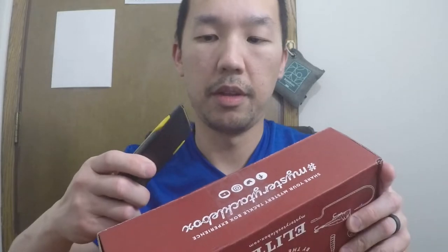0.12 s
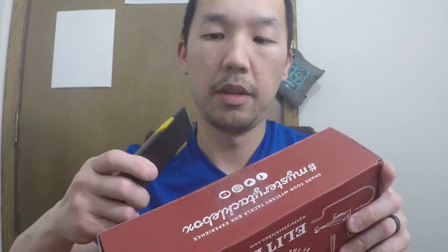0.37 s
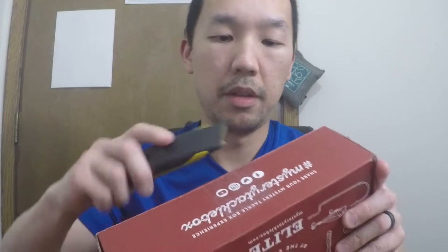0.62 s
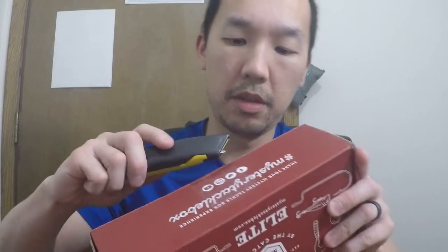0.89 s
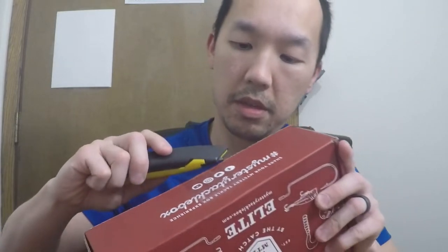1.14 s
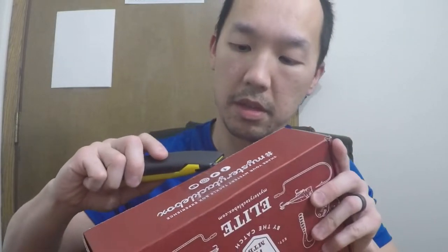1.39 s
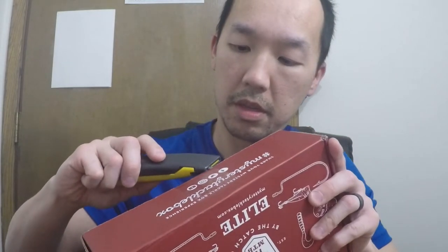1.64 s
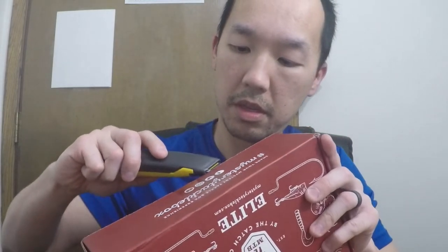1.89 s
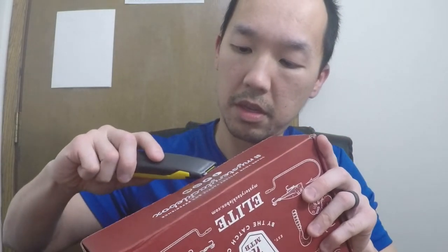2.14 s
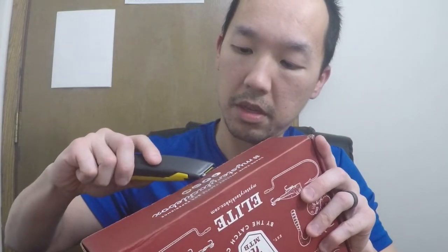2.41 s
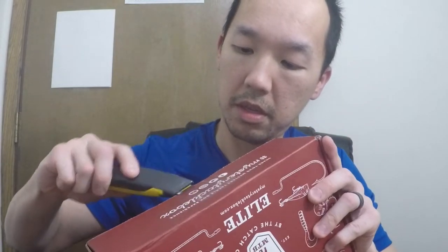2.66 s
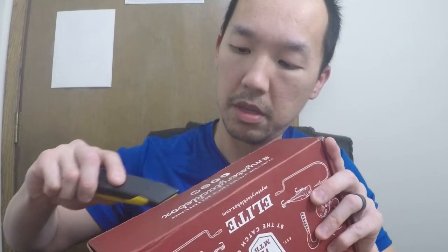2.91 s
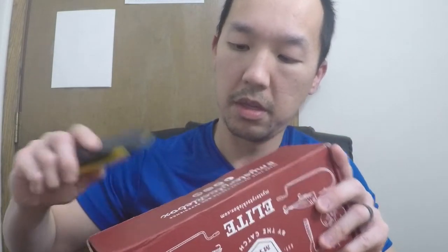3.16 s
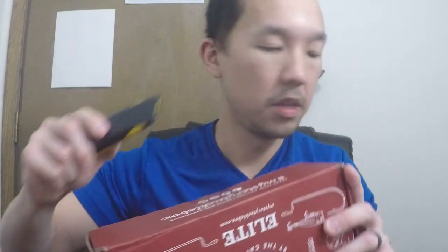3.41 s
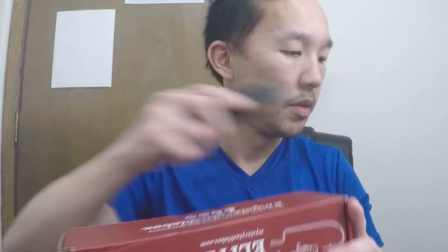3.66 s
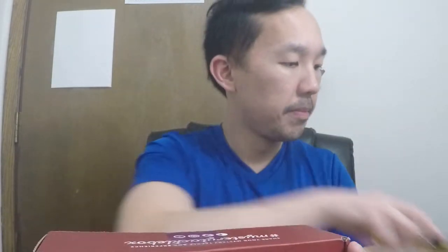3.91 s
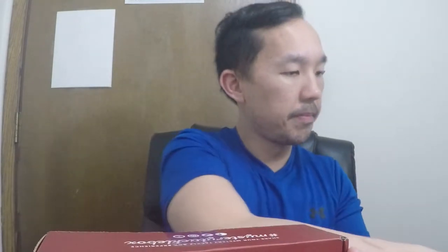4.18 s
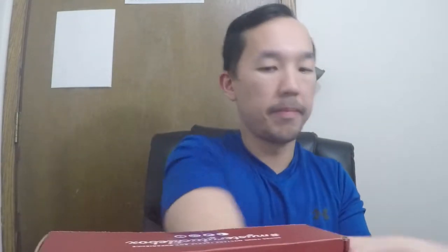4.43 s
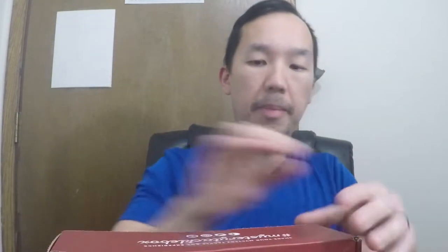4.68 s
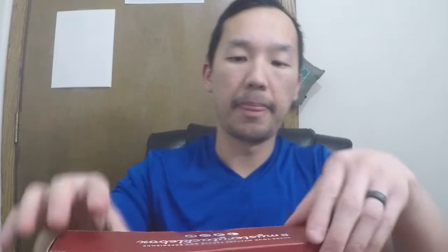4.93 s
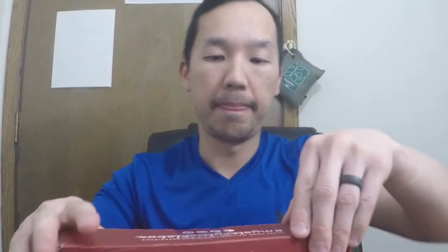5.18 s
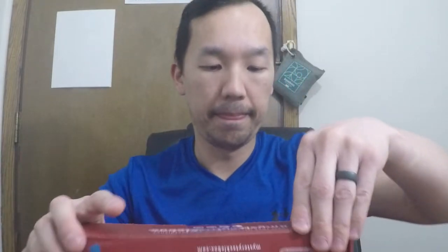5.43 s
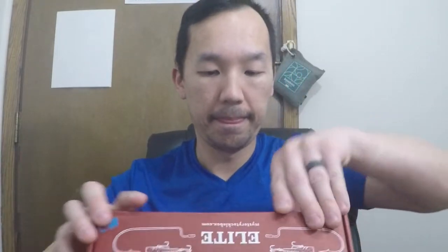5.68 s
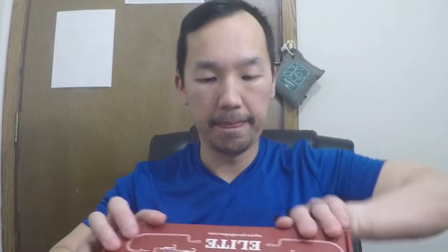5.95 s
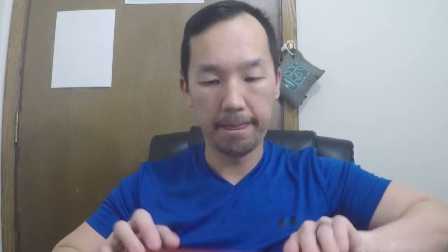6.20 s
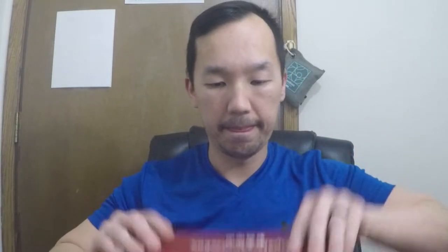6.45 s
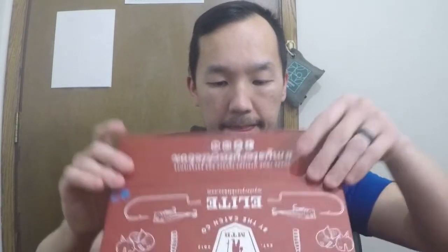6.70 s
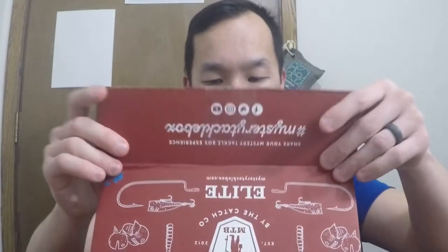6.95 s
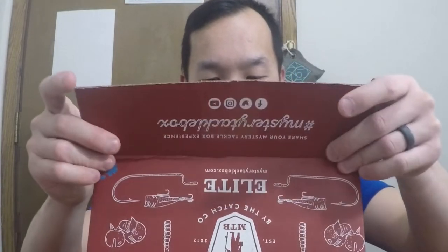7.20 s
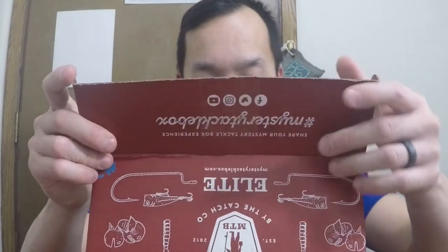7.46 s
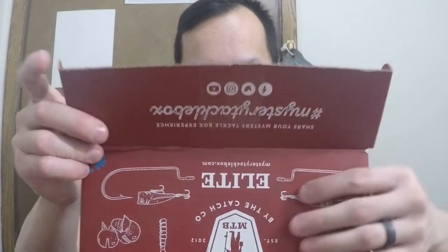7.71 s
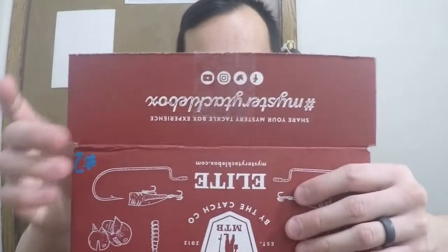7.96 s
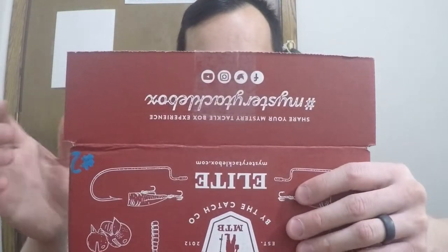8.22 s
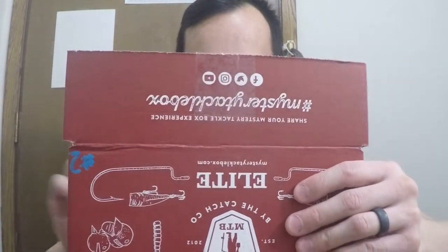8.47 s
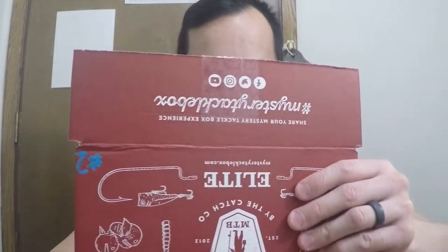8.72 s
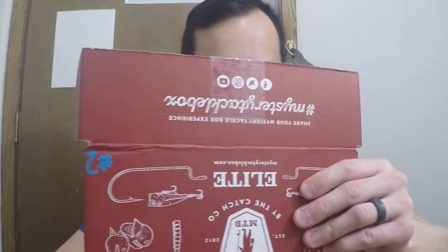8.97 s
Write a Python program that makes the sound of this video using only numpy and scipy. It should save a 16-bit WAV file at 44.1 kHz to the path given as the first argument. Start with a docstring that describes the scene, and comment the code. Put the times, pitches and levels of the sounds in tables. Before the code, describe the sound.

A close, dry small room with faint wavering hiss and a low unsteady hum throughout. From 0 to 0.7 s a plastic knife rattles with bright clicks, over hollow box knocks near 0.1 s and a crisp scratch at 0.4. From 1.3 to 2.4 s come small picking ticks and faint scrapes. At 2.6 s a firm rasp slits the tape, a weaker one follows at 2.9, then clicks at 3.1 and a sharp snap at 3.5. Clicks and a low thud around 3.7-3.9 lead to scraping and a hard clatter at 4.2-4.5, the loudest moment. Quiet rubbing and taps follow near 5.2-5.4. From 5.5 to 6.5 s the lid drags open with coarse, creaking cardboard rasps and hollow thumps around 6.2-6.3. Lighter bumps and scrapes come at 6.7-7.1, soft fumbling at 7.7-8.2, then barely audible brushes to about 9 s.

```python
"""Utility knife and cardboard box

A knife rattles, picks at and slits the taped box close to a small camera's microphone in a quiet room.
The plastic knife clicks bright and the hollow box thuds low: pushes and rattles ring damped modes.
Rubbing, and the lid dragged open card on card, drive panels, creases and surface with random slips.
A noise tail makes the room; faint coloured hiss and an unsteady hum lie under it all."""
import sys
import numpy as np
from scipy import signal
from scipy.fft import rfft, irfft, next_fast_len
from scipy.io import wavfile
from scipy.ndimage import uniform_filter1d, minimum_filter1d

SR = 44100
rng = np.random.default_rng(int(sys.argv[2]) if len(sys.argv) > 2 else 0)


def to_wav(sig):
    """Store sig (one row per channel, or 1-D mono) as 16-bit WAV at the path in sys.argv[1].

    Samples outside -1..1 are clipped; the rate is SR.
    """
    pcm = np.clip(np.atleast_2d(sig), -1, 1) * 32767
    pcm = np.round(pcm).astype(np.int16)
    wavfile.write(sys.argv[1], SR, pcm.T)  # frames by channels


def field_ratio(decibels):
    """Amplitude ratio for a level in dB (20 dB per decade); scalars and array-likes work."""
    return 10 ** (np.asarray(decibels, dtype=float) / 20)


N = 401249
T = np.arange(N) / SR  # seconds
BELOW_DB = 9  # per octave: extra loss of the modes under the driven pitch

# Knife and blade contacts, close to the microphone. Each row: start in seconds, peak in dB before the
# low cut and the room, strongest ring in Hz, treble over the ring in dB before TREBLE_OFFSET_DB.
CONTACTS = [(0.0524, -14, 2400, -36), (0.0988, -9.5, 1820, -27), (.182, -21.5, 2250, -34),
            (0.319, -26.5, 4850, -34), (0.35, -31, 2050, -3), (0.384, -0.5, 4530, -24),
            (.5307, -15, 1780, -41), (0.542, -22, 1940, -17), (0.553, -20, 1800, -37),
            (0.566, -20, 1950, -34), (.5794, -27, 1930, -31), (0.6416, -29, 3230, -21),
            (0.6893, -13.5, 4180, -34.5), (0.7074, -22, 4160, -18), (1.2693, -22, 3300, -34),
            (1.279, -16.5, 2670, -22.5), (1.3458, -9.5, 2900, -13.5), (1.427, -26, 1780, -21),
            (1.4566, -25.5, 3120, -19), (1.479, -25.5, 2470, -35), (1.673, -17.5, 2270, -45),
            (1.8, -19.5, 2550, -5), (1.806, -15.5, 2600, -21), (1.8176, -16, 2830, -24),
            (1.869, -24.5, 3000, -13), (1.9072, -17, 3400, -39), (1.954, -30, 2400, -34),
            (1.9807, -20.5, 1820, -33), (2.053, -19.5, 3300, -23), (2.0677, -15.5, 1970, -40),
            (2.121, -24.5, 1900, -43), (2.15, -23, 1930, -43), (2.191, -25, 1820, -45),
            (2.22, -28, 1810, -39), (2.236, -25, 1840, -50), (2.307, -24, 1820, -38),
            (2.322, -29, 2600, -10), (2.377, -16.5, 1840, -21), (2.4764, -25, 1840, -45),
            (2.9831, -15, 2120, -33), (3.0139, -16.5, 2030, -38), (3.096, -6.5, 2440, -17),
            (3.1068, -4, 3800, -15), (3.1397, -13.5, 2530, -19), (3.2286, -11.5, 2950, -64),
            (3.3047, -17.5, 2420, -9.5), (3.3971, -19.5, 2160, -32), (3.4988, -4, 5190, 13),
            (3.514, -13, 2800, -51), (3.524, -1, 3470, -18), (3.7268, -5, 1830, -24.5),
            (3.7463, -8, 1730, -7), (3.8823, -19, 2700, -24), (4.0585, -25.5, 2780, -22),
            (4.2073, -2, 2840, -12), (4.221, -16, 2830, -2), (4.23, -7, 2850, -51),
            (4.356, -11.5, 2530, -32), (4.367, 5, 3130, -7), (4.4094, -5, 3000, -8.5),
            (4.4629, 18.5, 3300, -8.5), (4.627, -36, 5200, -2), (4.929, -42, 3300, -12),
            (5.352, -26, 2600, -26), (5.378, -20.5, 2400, -18), (5.3194, -22, 2580, -48),
            (5.3891, -17.5, 2120, -21.5), (5.478, -14.5, 2120, -18), (5.4985, -7, 2230, -40),
            (6.0498, -11, 1990, -10), (7.73, -31, 1840, -21), (7.855, -15, 1980, -33)]
# Modes of knife shell and blade. Each row: pitch in Hz, level in dB, free decay time (t60) in seconds.
KNIFE_MODES = [(1854, -1.5, 0.019), (2087, -3.5, 0.015), (2450, -2.5, 0.02), (2750, 0, 0.0073),
               (3300, 0, 0.0072), (3800, -4.5, 0.0081), (4630, 0.5, 0.012), (5340, -6.5, 0.0059),
               (5900, -1, 0.0092), (6660, 3, .007), (9000, -14, .006), (9700, 6, .005), (12300, -29, .004)]
RATTLE_S, RATTLE_DB = 0.036, -17.5  # blade chatter after a click: t60, level before softness and jolt spread
CLEAN_DB = 17.5  # the dullest clicks chatter this much less
TREBLE_OFFSET_DB = -23  # added to the modes above 6 kHz in all clicks


def knife():
    """Loose blade and slider chatter in the plastic shell, too small to radiate bass."""
    s, db, hz, treble_db = np.transpose(CONTACTS)
    # a dull, soft contact pushes longer and rings few modes; a bright clatter rings all and chokes them
    soft = np.clip(-treble_db / 30, .3, 1)
    clicks = strike(s, db, hz, KNIFE_MODES, RATTLE_S, RATTLE_DB - CLEAN_DB * soft ** 2,
                    tilt_db=treble_db + TREBLE_OFFSET_DB, focus_db=6 + 18 * soft ** 2,
                    push_s=0.0002 * soft, free=soft, spread_db=4)
    return signal.sosfilt(signal.butter(4, 1550, "high", fs=SR, output="sos"), clicks)


# Blows on the hollow box and desk, close by. Each row: start in seconds, peak in dB before the room,
# strongest ring in Hz.
BLOWS = [(.003, -27, 288), (.051, -7, 310), (.056, -12, 760), (.103, -11.5, 700), (0.099, -6.5, 340),
         (.122, -11, 620), (1.275, -31, 266), (1.319, -20.5, 297), (1.425, -17, 340), (1.456, -31, 255),
         (1.901, -27, 334), (1.973, -30, 296), (2.321, -28.5, 322), (2.64, -20, 363), (2.89, -22.5, 382),
         (3.094, -14, 286), (3.108, -20, 205), (3.739, -23.5, 342), (3.796, -19.5, 336), (3.879, -3, 217),
         (3.908, -15, 240), (3.949, -12, 126), (4.214, -25.5, 225), (4.351, -8.5, 440), (4.407, -17.5, 256),
         (4.899, -38, 346), (5.172, -35, 305), (5.226, -26.5, 371), (5.289, -20, 325), (5.383, -25, 274),
         (5.493, -25, 368), (5.944, -10, 780), (6.04, -17, 275), (6.195, -5, 476), (6.299, -1, 320),
         (6.312, -11, 125), (6.905, -22.5, 126), (8.004, -41, 630), (6.806, -14, 340), (6.852, -24, 334),
         (6.89, -16.5, 333), (7.316, -43, 223), (7.741, -30, 250), (7.819, -20.5, 253), (7.859, -22.5, 127),
         (7.983, -27.5, 273), (8.228, -27, 346)]
# Modes of box panels and cavity, also driven by rubbing. Each row: pitch in Hz, level in dB, t60 in seconds.
BOX_MODES = [(127, 3.5, 0.14), (166.3, 2, 0.043), (205, -1.5, 0.067), (250, 1.5, 0.074), (290.2, -0.5, 0.1),
             (340, 3, 0.049), (426.4, -0.5, 0.036), (515, -2, 0.017), (633, -2.5, 0.031), (736, -3, 0.038),
             (854, -6, 0.017), (1030, -15, 0.035), (1127, -12, 0.037), (1286, -37.5, 0.033)]
SHUDDER_S, SHUDDER_DB = 0.074, -33.5  # panel shudder after a blow: t60, level before jolt spread


def thuds():
    """Fingers, blade and desk knock the box; a deeper knock is a longer, softer push."""
    s, db, hz = np.transpose(BLOWS)
    return strike(s, db, hz, BOX_MODES, SHUDDER_S, SHUDDER_DB, tilt_db=0, focus_db=13,
                  push_s=0.25 / hz, free=1, spread_db=5.5)


def strike(s, db, hz, modes, dies_s, rattle_db, tilt_db, focus_db, push_s, free, spread_db):
    """Each blow is a short push and a dying rattle; modes near its strongest ring are driven hardest."""
    span = np.arange(SR // 5) / SR
    out = np.zeros(N + len(span))
    blows = np.broadcast_arrays(s, db, hz, dies_s, rattle_db, tilt_db, focus_db, push_s, free)
    for start, peak_db, pitch, dies, rattle, tilt, focus, push, freedom in zip(*blows):
        grip = rng.standard_normal((len(modes), 2))  # each blow shifts the levels and pitches anew
        jolt_db = spread_db * (rng.exponential(size=len(span)) + 2.5)
        jolts = rng.standard_normal(len(span)) * field_ratio(jolt_db)
        force = field_ratio(rattle) * jolts * np.exp(-np.log(1000) * span / dies)
        force[0] = 1
        push_shape = signal.windows.hann(max(int(push * SR), 3))
        force = np.convolve(force, push_shape)[:len(span)]
        blow = np.zeros(len(span))
        for (f, mode_db, t60), (louder, sharper) in zip(modes, grip):
            gain_db = mode_db - off_pitch_db(f, pitch, focus) + tilt * (f > 6000) + 2 * louder
            blow += field_ratio(gain_db) * ring(force, f * (1 + .015 * sharper), t60 * freedom)
        at = int(start * SR)
        out[at:at + len(span)] += blow * field_ratio(peak_db) / np.abs(blow).max()
    return out[:N]


# Modes of the rubbed card and tape surface. Each row: pitch in Hz, level in dB, t60 in seconds
# (ring() lets none die faster than 2 ms).
SURFACE_MODES = [(1917, 11, 0.016), (2280, 9.5, 0.0088), (2700, 11, 0.0041), (2800, -4, 0.012),
                 (3370, 8.5, 0.0037), (4300, 4, 0.0019), (5240, 13.5, 0.0012), (5600, -24, 0.009)]
# Spectrum of the sharp edge of the rasp. Each row: frequency in Hz, relative density in dB per Hz.
EDGE_SPECTRUM = [(3530, -22), (6000, 2.5), (7610, 3.5), (9320, -5), (13500, -9.5), (14500, -15),
                 (15500, -15.5)]
CREAK_DB, CREAK_SLOPE = -58, 1.63  # creak at a drone of -35 dB, dB per dB of drone
CREAK_FROM_RASP_DB = -25.5  # the rasp feeds the creak too
EDGE_DB, EDGE_DB_PER_OCTAVE = -10, 4.5  # edge over a rasp pitched at 2800 Hz; a higher rasp has more
DULL_HZ, BRIGHT_HZ = 2250, 2900  # rasp pitches with a dulled and with the full edge
DULL_TOP_HZ = 8150  # corner of the dulled edge


def rubbing():
    """Stick-slip of card, tape and skin drones in the panels, creaks in the creases and rasps at the surface."""
    drone_db, rasp_db, panel_hz, rasp_hz = controls()
    creak_from_drone = field_ratio(CREAK_DB + CREAK_SLOPE * (drone_db + 35))
    creak_gain = np.hypot(creak_from_drone, field_ratio(rasp_db + CREAK_FROM_RASP_DB))
    edge_db = rasp_db + EDGE_DB + EDGE_DB_PER_OCTAVE * np.log2(rasp_hz / 2800)
    slips = grains(spread_db=4, patchy_db=4, rate=70)
    drone = rubbed(slips, BOX_MODES[:9], panel_hz, focus_db=10.5, waver_db=7, rate=20)
    creak = rubbed(slips, BOX_MODES[9:], 900, focus_db=1.5, waver_db=4, rate=25)
    fibres = grains(spread_db=2, patchy_db=1, rate=140)
    rasp = rubbed(fibres, SURFACE_MODES, rasp_hz, focus_db=7.5, waver_db=5, rate=30)
    rasp = signal.sosfilt(signal.butter(3, [1600, 6200], "band", fs=SR, output="sos"), rasp)
    edge = steady(colour(fibres, EDGE_SPECTRUM))
    dull = signal.sosfilt(signal.butter(1, DULL_TOP_HZ, fs=SR, output="sos"), edge)
    brightness = np.clip((rasp_hz - DULL_HZ) / (BRIGHT_HZ - DULL_HZ), 0, 1)
    edge = dull + brightness * (edge - dull)
    return field_ratio(drone_db) * drone + creak_gain * creak + field_ratio(rasp_db) * rasp + field_ratio(edge_db) * edge


# Scrapes that start with a jerk and fade. Each row: peak in seconds, fade in seconds, panel drone in dB,
# surface rasp in dB, rasp pitch in Hz.
SCRAPE_STROKES = [(.002, 0.074, -41, -47.5, 2400), (0.058, 0.17, -30, -34.5, 2020),
                  (.18, 0.056, -39, -39, 2050), (.384, 0.14, -48.5, -18, 3800),
                  (.532, 0.1, -45, -33.5, 1980), (0.697, 0.059, -46.5, -31.5, 4000),
                  (1.279, 0.13, -54, -39.5, 2900), (1.675, 0.19, -49.5, -47.5, 2280),
                  (2.599, 0.15, -24, -25, 2540), (2.896, 0.19, -33, -29.5, 2640),
                  (3.094, 0.13, -43, -32.5, 2850), (3.4, 0.21, -48, -32.5, 2160),
                  (3.502, 0.15, -51, -20, 3650), (3.741, 0.2, -37.5, -29.5, 2380),
                  (3.89, 0.46, -39, -50, 2250), (4.213, 0.2, -28, -19, 2780),
                  (4.361, 0.095, -24.5, -16.5, 3000), (4.407, .12, -36, -20.5, 3340),
                  (4.466, 0.043, -14.5, -16, 3000), (4.907, 0.28, -39, -50, 2600),
                  (7.747, 0.22, -36.5, -33.5, 2700), (8.232, 1.7, -56, -54.5, 2750)]
# Brushes of hand and blade that swell and fade. Each row: peak in seconds, fade in seconds,
# panel drone in dB, surface rasp in dB, rasp pitch in Hz.
BRUSH_STROKES = [(1.378, 0.17, -55, -45, 3090), (1.91, 0.21, -44, -47.5, 3050),
                 (1.988, 0.04, -32.5, -38.5, 2080), (2.07, 0.051, -47, -45, 2000),
                 (2.33, 0.042, -57, -45.5, 2320), (2.655, 0.065, -25.5, -25, 2800),
                 (3.022, 0.22, -37, -39.5, 1990), (3.228, .1, -45, -38, 2900),
                 (3.312, 0.067, -46.5, -42.5, 2850), (3.67, 0.36, -39.5, -36, 3540),
                 (3.863, 0.044, -28.5, -33, 3230), (4.525, 0.14, -25.5, -22.5, 3020),
                 (5.224, 0.081, -39, -44.5, 2420), (5.318, 0.13, -37.5, -42, 2600),
                 (5.404, 0.12, -42, -40.5, 2550), (7.332, 0.058, -40.5, -37.5, 3330),
                 (7.44, 0.057, -46.5, -44, 2500), (7.473, 0.022, -50, -45.5, 2700),
                 (6.735, 0.026, -35, -30, 2750), (7.862, 0.048, -27, -36, 2050),
                 (7.988, 0.054, -38.5, -39.5, 2750), (7.68, 0.024, -66, -58, 2600),
                 (8.82, .1, -55, -56.5, 2750), (8.602, 0.078, -54, -52.5, 2900),
                 (9.09, 0.16, -51, -50.5, 2650)]
# The lid dragged open, card on card. Each row: time in seconds, panel drone in dB, surface rasp in dB,
# panel pitch in Hz, rasp pitch in Hz.
LID_DRAG = [(5.47, -49, -60, 404, 2400), (5.498, -25.5, -27.5, 396, 2310), (5.544, -37, -41.5, 357, 2380),
            (5.622, -23, -22.5, 440, 2150), (5.672, -27.5, -31.5, 440, 2160),
            (5.726, -15.5, -15, 520, 2070), (5.846, -23.5, -33.5, 565, 2030), (5.896, -28, -35, 372, 2490),
            (5.97, -21, -25.5, 494, 2540), (6.03, -30, -34, 436, 2400), (6.05, -19, -29, 426, 2440),
            (6.078, -27, -27, 347, 2570), (6.144, -24.5, -23, 462, 2460), (6.218, -17.5, -22.5, 459, 2500),
            (6.302, -17, -26.5, 360, 2300), (6.436, -22.5, -30, 356, 2470), (6.486, -33, -31, 510, 2450),
            (6.55, -40.5, -35, 328, 2900), (6.754, -37.5, -37, 396, 2700), (6.788, -49, -47, 353, 2710),
            (6.808, -37, -38.5, 367, 2810), (6.872, -41, -43, 379, 2500), (6.912, -29.5, -29.5, 338, 2520),
            (6.992, -40, -42.5, 405, 2670), (7.09, -37.5, -41.5, 420, 2780),
            (7.25, -58.5, -60.5, 333, 2290)]
JERK_S = 0.014  # rise of a scrape; a brush rises as long as it fades
FADE_DB, FADE_BEND = 24.5, 1.75  # drop after one fade, curvature
HOLD_DRONE_DB, HOLD_RASP_DB, HOLD_RASP_HZ = -62, -71.5, 2600  # hands merely holding the box


def strokes():
    """Powers of the lid and all strokes add up; the loudest one weighs most in the pitch of the rasp."""
    s, drone_db, rasp_db, _, hz = np.transpose(LID_DRAG)
    # doubled dB turn amplitudes into powers
    drone = field_ratio(2 * np.interp(T, s, drone_db, left=HOLD_DRONE_DB, right=HOLD_DRONE_DB))
    rasp = field_ratio(2 * np.interp(T, s, rasp_db, left=HOLD_RASP_DB, right=HOLD_RASP_DB))
    weighted_hz = rasp * np.interp(T, s, hz, left=HOLD_RASP_HZ, right=HOLD_RASP_HZ)
    rows = [(JERK_S, *row) for row in SCRAPE_STROKES] + [(row[1], *row) for row in BRUSH_STROKES]
    for rise, peak, fade, drone_db, rasp_db, hz in rows:
        distance = np.maximum((peak - T) / rise, (T - peak) / fade)
        shape = field_ratio(-2 * FADE_DB * distance ** FADE_BEND)
        drone = drone + field_ratio(2 * drone_db) * shape
        rasp = rasp + field_ratio(2 * rasp_db) * shape
        weighted_hz = weighted_hz + field_ratio(2 * rasp_db) * shape * hz
    return 10 * np.log10(drone), 10 * np.log10(rasp), weighted_hz / rasp


PANEL_HZ, PANEL_DB_PER_OCTAVE = 278, 70  # pitch at a drone of -36 dB; firmer rubbing reaches higher panels


def controls():
    """Panel pitch follows the firmness of the rub, except while the lid drags across the panels."""
    drone_db, rasp_db, rasp_hz = strokes()
    s, lid_hz = np.transpose(LID_DRAG)[[0, 3]]
    firm_hz = PANEL_HZ * 2 ** ((drone_db + 36) / PANEL_DB_PER_OCTAVE)
    dragging = (T > s[0]) & (T < s[-1])
    panel_hz = np.where(dragging, np.interp(T, s, lid_hz), firm_hz)
    return drone_db, rasp_db, panel_hz, rasp_hz


def grains(spread_db, patchy_db, rate):
    """Dense tiny slips of very uneven size, coming in patches."""
    size_db = np.minimum(spread_db * rng.exponential(size=N), 22) + patchy_db * walk(rate)
    return level(field_ratio(size_db) * rng.standard_normal(N), 0)


def rubbed(slips, modes, hz, focus_db, waver_db, rate):
    """Slips drive a set of wavering modes, most strongly those near a pitch that may move."""
    out = np.zeros(N)
    for f, mode_db, t60 in modes:
        gain_db = mode_db - off_pitch_db(f, hz, focus_db) + waver_db * walk(rate)
        out += field_ratio(gain_db) * level(ring(slips, f, t60), 0)
    return steady(out)


def off_pitch_db(f, hz, focus_db):
    """Loss of a mode at f driven at hz: focus_db per octave away, and more below."""
    return focus_db * abs(np.log2(f / hz)) + BELOW_DB * np.maximum(np.log2(hz / f), 0)


def ring(x, hz, t60):
    """One damped mode that radiates nothing far below its pitch."""
    r = np.exp(-np.log(1000) / (max(t60, .002) * SR))
    w = 2 * np.pi * hz / SR
    return signal.lfilter([.5, 0, -.5], [1, -2 * r * np.cos(w), r * r], x)


def steady(y):
    """Hold the level near 1 over spans of 50 ms; faster grain stays."""
    return y / np.sqrt(uniform_filter1d(y ** 2, SR // 20) + 1e-12)


def level(x, db):
    """Scale to an rms level."""
    return x * field_ratio(db) / np.sqrt(np.mean(x ** 2))


def colour(x, spectrum):
    """Shape by (Hz, dB) points."""
    hz, db = np.transpose(spectrum)
    size = next_fast_len(N)
    gain = field_ratio(np.interp(np.log(np.fft.rfftfreq(size, 1 / SR) + 1), np.log(hz), db))
    return irfft(rfft(x, size) * gain, size)[:N]


def walk(rate):
    """Random levels held 1 / rate s and slewed; spread near 1."""
    k = int(SR / rate)
    held = np.repeat(rng.standard_normal(N // k + 1), k)
    return uniform_filter1d(held, k)[:N]


ROOM_T60_S, ROOM_TREBLE_T60_S = 0.21, 0.13  # below and above 2 kHz
ROOM_DB = -10.5  # energy of the tail


def room(x):
    """Small furnished room: a noise tail whose treble dies first."""
    t = np.arange(SR // 2) / SR
    low, high = (signal.sosfilt(signal.butter(1, 2000, kind, fs=SR, output="sos"), rng.standard_normal(len(t)))
                 for kind in ("low", "high"))
    tail = low * 1000 ** (-t / ROOM_T60_S) + high * 1000 ** (-t / ROOM_TREBLE_T60_S)
    tail = tail * np.clip((t - .005) / 0.0055, 0, 1)  # silent for 5 ms, then fades in
    return signal.fftconvolve(x, tail * field_ratio(ROOM_DB) / np.sqrt(np.sum(tail ** 2)))[:N]


# Room air and microphone hiss. Each row: frequency in Hz, relative density in dB per Hz.
AIR_SPECTRUM = [(15, -57), (25, -38), (53, -62.5), (101, -7.5), (240, 0), (313, -2), (552, -18),
                (1020, -20), (1110, -16.5), (1450, -28), (1800, -16.5), (2060, -22), (9050, -30),
                (15500, -35.5)]
AIR_DB = -54  # rms before the waver
HUM_HZ, HUM_DB = 118.3, -57  # pitch, rms level


def air():
    """Wavering hiss and rumble, and a hum of noise through one narrow resonance."""
    hiss = level(colour(rng.standard_normal(N), AIR_SPECTRUM), AIR_DB) * field_ratio(1.5 * walk(4))
    hum = level(ring(rng.standard_normal(N), HUM_HZ, 0.97), HUM_DB)
    return hiss + hum


def scene():
    """Everything handled shares the room."""
    near = knife() + thuds() + rubbing()
    return (near + room(near))[None]


def top_cut(x):
    """Nothing passes above the cut-off."""
    return signal.sosfilt(signal.butter(12, 16450, fs=SR, output="sos"), x)


def record(dry):
    """The sound has little deep bass and ends near 15.4 kHz; a limiter holds peaks, lets go within a few ms."""
    bass_cut = signal.butter(3, 100, "high", fs=SR, output="sos")
    x = signal.sosfilt(bass_cut, dry) + air()  # the camera's own noise skips the bass cut
    x = signal.sosfilt(signal.ellip(8, .2, 70, 15400, fs=SR, output="sos"), x)
    hold = SR // 200  # 5 ms
    gain = minimum_filter1d(np.minimum(1, .5 / (np.abs(x) + 1e-9)), hold)  # peaks held to half of full scale
    limited = x * uniform_filter1d(gain, hold // 2)
    return top_cut(limited)


dry = scene()
out = record(dry)
to_wav(out)
```